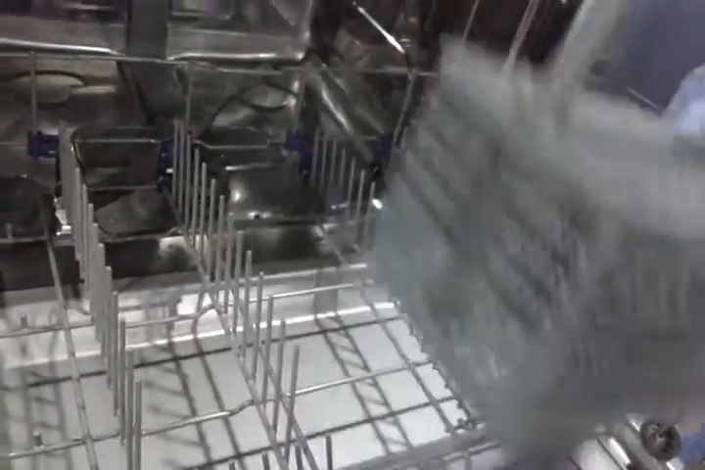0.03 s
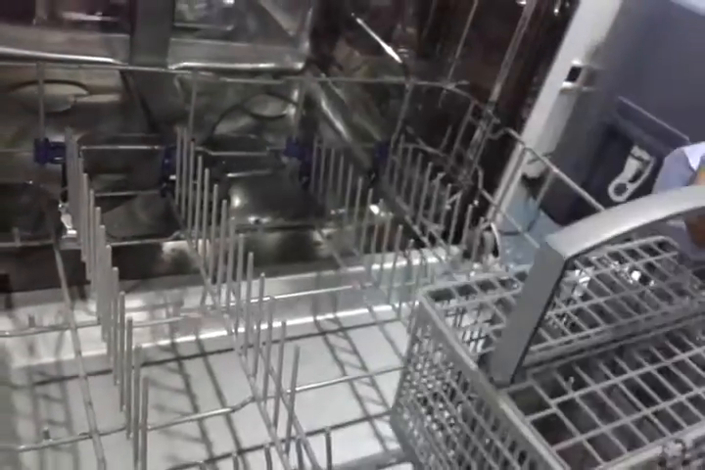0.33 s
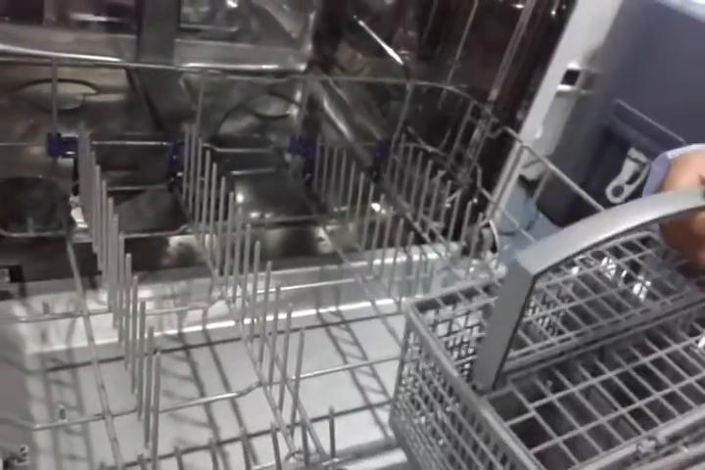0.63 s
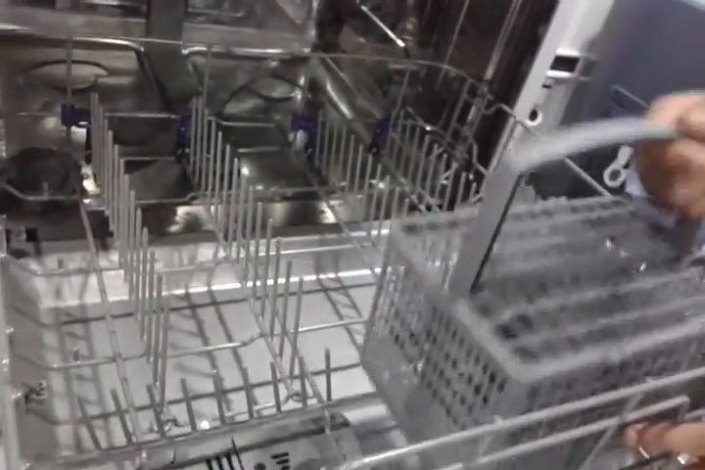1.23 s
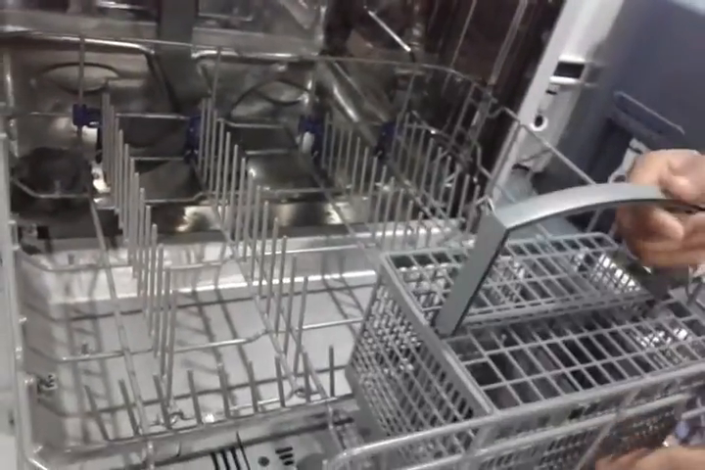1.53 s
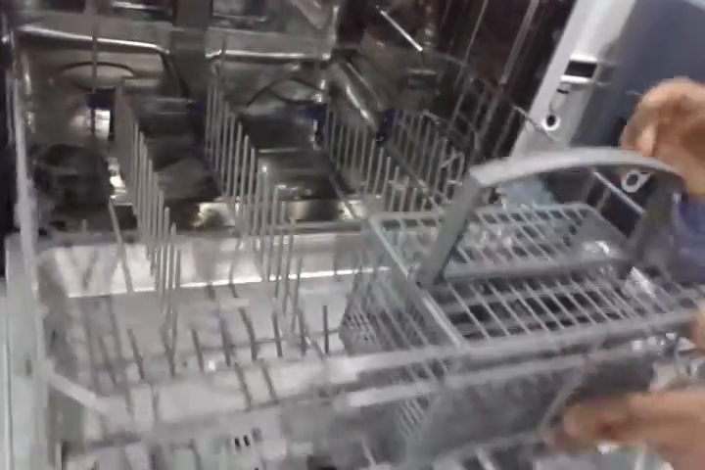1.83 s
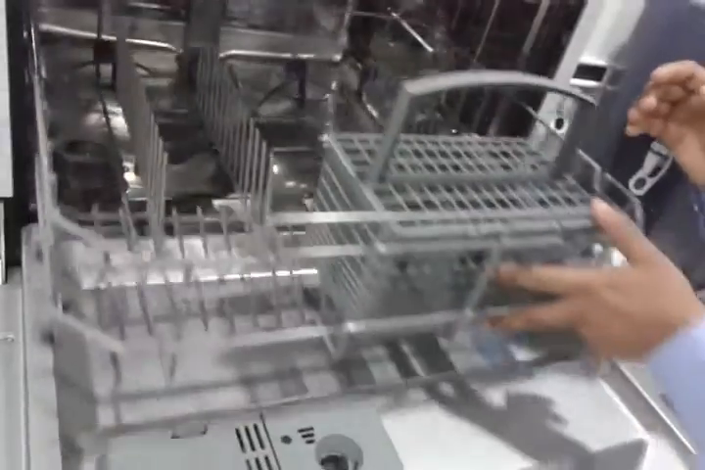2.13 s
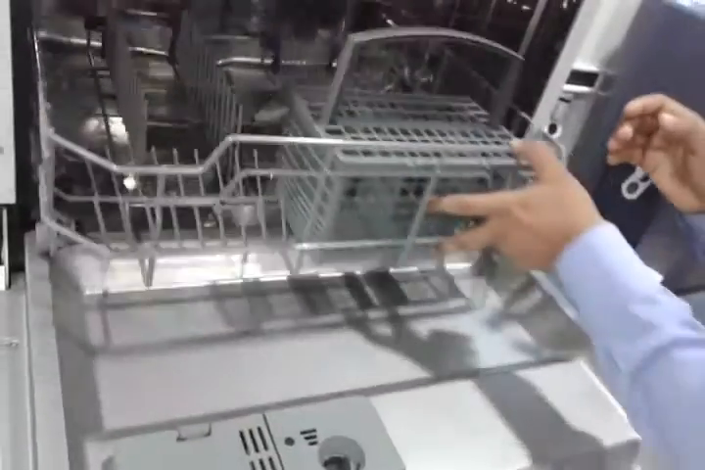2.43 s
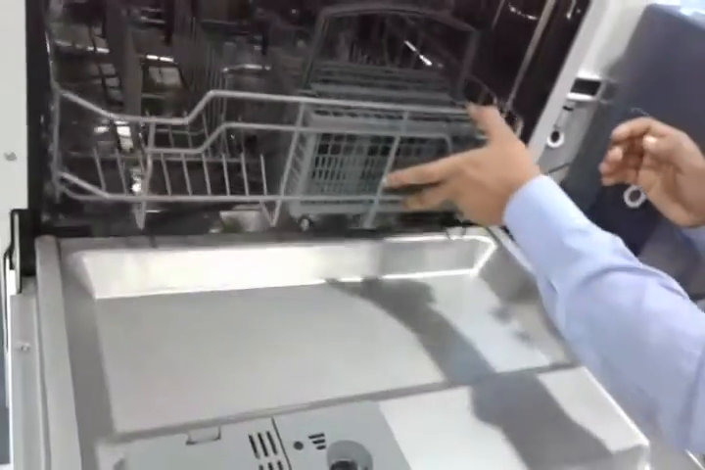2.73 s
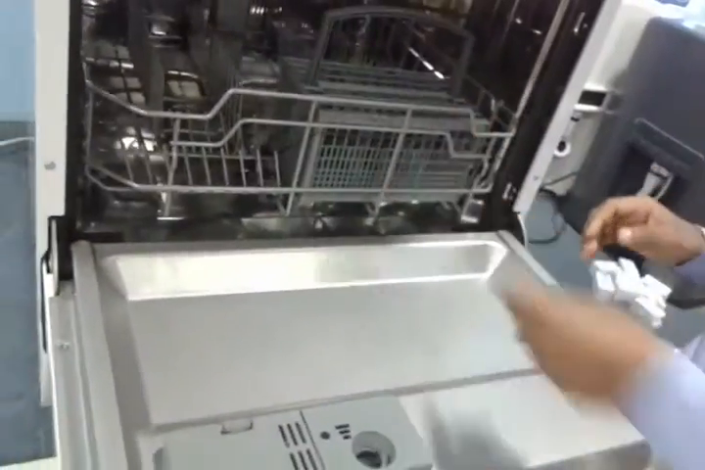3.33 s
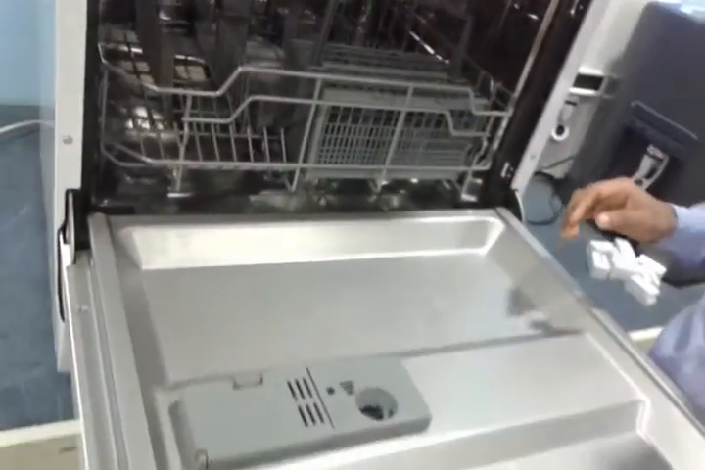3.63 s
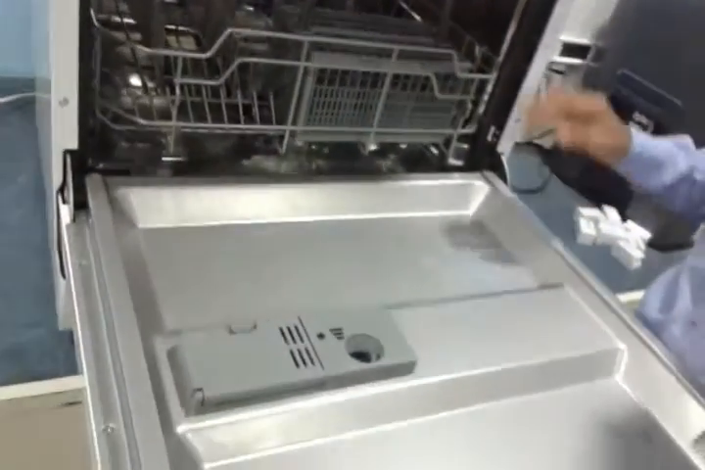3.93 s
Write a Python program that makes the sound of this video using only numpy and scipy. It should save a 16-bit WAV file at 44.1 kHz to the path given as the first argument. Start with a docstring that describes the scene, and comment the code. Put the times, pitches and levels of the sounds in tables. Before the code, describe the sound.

A dishwasher's wire rack clatters as a plastic cutlery basket lands in it at 0.3 seconds, with more clacks from 1 to 1.5 seconds. From about 1.8 seconds the rack rolls in, wheels rumbling and ticking, guides scraping. At 3 seconds it bangs against the stop; wires jangle and the steel tub booms, fading. A faint scrape comes near 4 seconds. Ventilation runs steadily in the small room.

```python
"""Over steady ventilation noise in a small hard room, a plastic cutlery basket clatters into a
dishwasher's wire rack, then is lifted and seated with a few clacks. The rack rolls in over the open
door, wheels rumbling and ticking, guides scraping. It bangs against the back stop: its wires
jangle and the steel tub booms."""
import sys
import numpy as np
from scipy import signal
from scipy.fft import rfft, irfft
from scipy.io import wavfile

SR = 44100
rng = np.random.default_rng(int(sys.argv[2]) if len(sys.argv) > 2 else 0)


def unload_audio(sound):
    """Save the sound as a 16-bit wav file, at the path given as the first command line argument."""
    columns = np.transpose(np.atleast_2d(sound))
    # keep every value between -1 and 1, then stretch to whole-number steps
    steps = np.round(np.clip(columns, -1, 1) * 32767)
    wavfile.write(sys.argv[1], SR, steps.astype(np.int16))


N = 176400
T = np.arange(N) / SR
RING_T = T[:SR]

# low resonances of the rack: pitch_hz, level_db, t60_s
RACK_MODES = [(113.4, -22.5, 0.42), (171, -31, .2), (222.6, -7, 0.22), (261.7, -1, 0.13),
              (291.2, -4.5, 0.25), (321.4, -5, 0.12), (353.2, -12.5, 0.2), (389.6, -13, 0.21),
              (426.6, -13.5, 0.2), (493.5, -20, .2)]
# spectrum of the rack's wires: freq_hz, level_db
WIRE_SPECTRUM = [(300, 11), (450, -3.5), (740, 1.5), (950, -7), (1400, -1), (1850, 1), (2400, -3.5),
                 (3100, -7), (3800, -3), (4400, 0), (5400, -2.5), (6200, -14.5), (8000, -24.5),
                 (13000, -44)]


def amp(db):
    """Decibels to gain."""
    return 10 ** (np.asarray(db) / 20)


def add(track, start_s, sound):
    """Mix a sound in at start_s."""
    i = int(start_s * SR)
    track[i:i + len(sound)] += sound[:N - i]


def butter(x, kind, cutoff_hz, order=2):
    """Butterworth filter."""
    return signal.sosfilt(signal.butter(order, cutoff_hz, kind, fs=SR, output="sos"), x)


def colour(x, spectrum):
    """Impose a spectrum, falling 12 dB per octave below its first point; rms 1."""
    freq_hz, level_db = np.array(spectrum).T
    bin_hz = np.arange(len(x) // 2 + 1) * SR / len(x)
    gain = amp(np.interp(np.log(bin_hz + 1), np.log(freq_hz), level_db))
    gain *= np.minimum(bin_hz / freq_hz[0], 1) ** 2
    shaped = irfft(rfft(x) * gain, len(x))
    return shaped / np.sqrt(np.mean(shaped ** 2))


def fade(t60_s):
    """One second of exponential decay."""
    return np.exp(-np.log(1000) * RING_T / t60_s)


def burst(spectrum, t60_s):
    """Dense modes dying together, as decaying noise."""
    return colour(rng.standard_normal(SR), spectrum) * fade(t60_s)


def ring(modes, detune=0):
    """Damped sines starting at rms 1; changing contact shifts each pitch a little."""
    rms = np.sqrt(sum(amp(level_db) ** 2 for _, level_db, _ in modes) / 2)
    shifts = 1 + detune * rng.standard_normal(len(modes))
    return sum(amp(level_db) * np.sin(2 * np.pi * pitch_hz * shift * RING_T) * fade(t60_s)
               for (pitch_hz, level_db, t60_s), shift in zip(modes, shifts)) / rms


def body_ring(modes, detune=0, build_s=0.006):
    """Low modes of a large body, which take a moment to build."""
    return butter(ring(modes, detune) * (1 - np.exp(-RING_T / build_s)), "band", (81.4, 2000))


def chatter(length_s, contacts_per_s=900):
    """A first contact and a quick run of dwindling ones; unit energy."""
    t = T[:SR // 20]
    taper = np.sqrt(np.maximum(1 - t / length_s, 0))
    sizes = rng.choice([-1, 1], len(t)) * rng.uniform(0.26, 1, len(t)) * taper
    hits = (rng.random(len(t)) < contacts_per_s / SR) * sizes
    hits[0] = 1
    return hits / np.sqrt(np.sum(hits ** 2))


def grains(contacts_per_s):
    """Random tiny contacts of uneven size."""
    hits = (rng.random(N) < contacts_per_s / SR) * rng.choice([-1, 1], N)
    level_db = np.minimum(rng.exponential(size=N), 4)
    return hits * amp(level_db)


def room(x, wet_db, split_hz=6000, build_s=0.0055):
    """Add the reverberation of tub and room, shorter in the treble."""
    noise = rng.standard_normal(SR)
    low = butter(noise, "low", split_hz, order=4) * fade(t60_s=0.71)
    high = butter(noise, "high", split_hz, order=4) * fade(t60_s=0.44)
    tail = (low + high) * (1 - np.exp(-RING_T / build_s))
    tail /= np.sqrt(np.sum(tail ** 2))
    return x + amp(wet_db) * signal.fftconvolve(x, tail)[:N]


def ventilation(air_db=-39, hiss_db=-71.5):
    """Steady air noise and a faint white hiss."""
    # air noise: freq_hz, level_db
    air_spectrum = [(15, -62), (25, -39), (44, -27), (74, -24), (87, -14.5), (119, -20.5), (140, -7),
                    (197, -12.5), (219, -3.5), (237, -0.5), (293, -7.5), (363, -5.5), (392, -8.5),
                    (425, -9), (498, -12.5), (539, -14.5), (824, -12), (940, -14), (1070, -17),
                    (1360, -17.5), (2030, -19.5), (2940, -28), (4600, -20), (7420, -40), (14000, -50)]
    air = amp(air_db) * colour(rng.standard_normal(N), air_spectrum)
    return air + amp(hiss_db) * rng.standard_normal(N)


def basket_knocks(jangle_re_click_db=-22.5, click_band_hz=(3800, 6060)):
    """Each knock clicks the plastic lattice, clacks its walls, shakes the rack and stirs its wires."""
    # basket on rack: start_s, chatter_s, click_db, crack_db, clack_db, thud_db
    knocks = [(0.271, .006, -36, -33.5, -35, -38), (0.285, .002, -34, -34, -34, -16),
              (0.292, .003, -45, -54, -23.5, -22), (0.3158, 0.0027, -21.5, -30, -25.5, -18.5),
              (0.322, .005, -19.5, -47, -21.5, -29), (0.3324, .001, -10, -24.5, -25, -24),
              (0.36, 0.017, -30, -33, -30, -25), (0.377, .010, -44, -48, -46, -20),
              (0.417, .002, -48, -50, -45, -21), (.5350, .004, -56, -64, -46, -25.5),
              (1.0353, 0.018, -21, -27, -23.5, -24), (1.094, .007, -28, -37.5, -33, -24),
              (1.105, .006, -44, -55, -36, -20.5), (1.189, .010, -38, -58, -48, -23),
              (1.2493, .001, -22, -41, -55, -46), (1.2593, .002, -50, -55, -31.5, -24),
              (1.302, .006, -51, -57, -47, -28), (1.3601, .002, -16.5, -26, -28.5, -28.5),
              (1.363, .005, -23, -46, -38, -25.5), (1.386, .012, -48, -56, -34.5, -28),
              (1.4220, .006, -22.5, -54, -37, -30), (1.4280, .012, -27, -40, -26, -17),
              (1.456, .006, -52, -57, -39, -32), (1.4740, .002, -42, -50, -49, -36),
              (1.5110, .016, -30.5, -35.5, -32, -19), (1.523, .006, -42, -49, -37, -30),
              (2.571, 0.013, -26.5, -36, -36, -53), (2.661, 0.0098, -27, -35, -34, -32)]
    # lattice resonances: pitch_hz, level_db, t60_s
    plastic_modes = [(4270, -13, 0.0043), (4760, 4, 0.008), (5140, 7.5, .007), (5450, -17, 0.0042)]
    # bright crack and midrange clack: freq_hz, level_db
    crack_spectrum = [(1500, -12), (3500, -3), (5300, 14), (7000, 0.5), (9000, -5), (11500, -11),
                      (13500, -13)]
    clack_spectrum = [(250, 11), (450, 2.5), (750, -3), (1200, -1.5), (2000, 1.5), (2450, -3), (3000, -12),
                      (4500, -8), (6000, -26), (9000, -46)]
    clicks, cracks, clacks, thuds, wires = np.zeros((5, N))
    for start_s, chatter_s, click_db, crack_db, clack_db, thud_db in knocks:
        hits = chatter(chatter_s)
        click = butter(ring(plastic_modes, detune=0.032), "band", click_band_hz)
        crack = burst(crack_spectrum, t60_s=0.028)
        clack = burst(clack_spectrum, t60_s=0.062)
        add(clicks, start_s, amp(click_db) * signal.fftconvolve(hits, click))
        add(cracks, start_s, amp(crack_db) * signal.fftconvolve(hits, crack))
        add(clacks, start_s, amp(clack_db) * signal.fftconvolve(hits, clack))
        add(thuds, start_s, amp(thud_db) * body_ring(RACK_MODES, detune=0.021))
        add(wires, start_s, amp(click_db + jangle_re_click_db) * burst(WIRE_SPECTRUM, t60_s=0.43))
    plastic = room(clicks, wet_db=-16) + room(cracks, wet_db=-7.5) + room(clacks, wet_db=-1.5)
    return plastic + wires + room(thuds, wet_db=-12.5)


def rack_rolling():
    """Wheels rumble over the door; the rack scrapes and bumps along its guides."""
    # rolling envelope: time_s, level_db
    roll_levels = [(1.72, -68), (1.879, -41.5), (2.02, -37), (2.2, -38), (2.38, -39), (2.55, -44),
                   (2.72, -40.5), (2.83, -45.5), (2.94, -39.5), (3.0, -68)]
    # scrapes and wheel bumps: peak_s, rise_s, fall_s, hiss_db, rattle_db, rumble_db
    scrapes = [(1.904, 0.014, 0.046, -57, -41, -39), (2.022, 0.015, 0.022, -36, -36.5, -46),
               (2.118, 0.0081, 0.028, -41.5, -40, -52), (2.355, 0.013, 0.045, -49.5, -38, -30),
               (2.485, .010, .014, -43.5, -38, -40), (2.516, 0.0073, 0.024, -49, -41, -39),
               (2.574, .010, .015, -35.5, -41, -41), (2.666, 0.013, 0.012, -33, -36.5, -33.5),
               (2.695, 0.018, 0.12, -58, -41, -57), (2.890, 0.0086, 0.02, -37.5, -35.5, -46),
               (3.96, 0.05, 0.076, -46.5, -65, -63)]
    # wheel noise and the three scrape layers: freq_hz, level_db
    wheel_spectrum = [(40, -37), (110, 3.5), (170, -3), (260, 1), (420, 0.5), (700, -1), (1100, -9),
                      (1600, -10), (2800, -19.5), (4500, -14), (6500, -26), (13000, -44)]
    hiss_spectrum = [(1000, -36), (2700, -1.5), (4000, 1), (5300, 1), (6600, -9.5), (9000, -16.5),
                     (13500, -27)]
    rattle_spectrum = [(300, -14), (700, 3), (1100, 3.5), (1550, 8.5), (2200, -3.5), (3000, -16),
                       (6000, -32)]
    rumble_spectrum = [(50, -17), (110, -12), (170, -4.5), (260, 3), (400, -3.5), (600, -8), (1200, -45)]
    time_s, level_db = np.array(roll_levels).T
    wheels = colour(grains(contacts_per_s=1500), wheel_spectrum)
    wheels *= amp(np.interp(T, time_s, level_db, left=-120, right=-120))
    envelopes = np.zeros((3, N))
    for peak_s, rise_s, fall_s, *layers_db in scrapes:
        shape = np.exp(-(np.minimum(T - peak_s, 0) / rise_s) ** 2 - np.maximum(T - peak_s, 0) / fall_s)
        envelopes += amp(layers_db)[:, None] * shape
    spectra = hiss_spectrum, rattle_spectrum, rumble_spectrum
    rubs = sum(envelope * colour(grains(contacts_per_s=1400), spectrum)
               for envelope, spectrum in zip(envelopes, spectra))
    return room(wheels + rubs, wet_db=-8)


def wheel_ticks(rail_s=2.662, rail_db=-36):
    """The wheels tick at joints in the guides and ring the frame as they drop onto the tub's rail."""
    # joint crossings: start_s, level_db
    joints = [(2.484, -54), (2.750, -45)]
    # one tick: freq_hz, level_db
    tick_spectrum = [(6000, -11), (9000, 0), (13500, -3)]
    # wire frame resonances: pitch_hz, level_db, t60_s
    frame_modes = [(722, 0, 0.42), (1563, -6, 0.22)]
    ticks = np.zeros(N)
    for start_s, level_db in joints:
        add(ticks, start_s, amp(level_db) * burst(tick_spectrum, t60_s=0.03))
    track = room(ticks, wet_db=-10)
    add(track, rail_s, amp(rail_db) * body_ring(frame_modes))
    return track


def back_stop_bang(jangle_re_wire_db=-10.5, tines_re_wire_db=-17):
    """The rack hits its stop and rebounds: a hard clash, jangling wires, clear tines, a tub boom."""
    # rack on stop: start_s, chatter_s, wire_db, clash_db, thud_db, boom_db
    blows = [(2.9591, 0.0099, -19.5, -15, -20, -22), (2.9680, 0.0056, -13, -18, -26, -25.5),
             (2.9756, 0.0055, -21, -18, -32, -22), (3.005, .004, -24, -29, -28, -40)]
    # steel tub and tine resonances: pitch_hz, level_db, t60_s
    tub_modes = [(115.7, -1, 0.58), (118, 1, .56), (151, 2.5, 0.6), (184, -17, 0.99), (264, 6.5, 0.22),
                 (312.5, -1, 0.54), (466, -13, 0.64), (620, -13, .6)]
    tine_modes = [(1420, -8, .7), (1500, 1, .8), (1875, 4, .7), (1854, 7, 0.51), (3580, -7, .7),
                  (3875, 0, .75), (3940, 5, 0.63), (4171, 4, 0.68), (4220, 4, 0.51), (4350, 3, 0.57),
                  (5063, -1, 0.99), (5190, -10, 0.88)]
    # hard contact: freq_hz, level_db
    clash_spectrum = [(1500, -19), (3500, 8), (5500, 8), (7000, -5.5), (9000, -12.5), (11000, -17),
                      (13500, -25)]
    metal, clashes, booms = np.zeros((3, N))
    thud, boom = body_ring(RACK_MODES), body_ring(tub_modes)
    for start_s, chatter_s, wire_db, clash_db, thud_db, boom_db in blows:
        contact = amp(wire_db) * burst(WIRE_SPECTRUM, t60_s=0.054)
        contact += amp(clash_db) * burst(clash_spectrum, t60_s=0.043)
        add(clashes, start_s, signal.fftconvolve(chatter(chatter_s), contact))
        jangle = amp(jangle_re_wire_db) * burst(WIRE_SPECTRUM, t60_s=0.98)
        tines = amp(tines_re_wire_db) * ring(tine_modes, detune=0.00104)
        add(metal, start_s, amp(wire_db) * (jangle + tines))
        add(booms, start_s, amp(thud_db) * thud + amp(boom_db) * boom)
    return metal + room(clashes, wet_db=-8.5) + room(booms, wet_db=-15.5)


def scene():
    """Basket, rolling rack and bang over the room's air; the machine's sounds carry nothing below about 70 Hz."""
    machine = basket_knocks() + rack_rolling() + wheel_ticks() + back_stop_bang()
    return (ventilation() + butter(machine, "high", cutoff_hz=70))[None]


def record(dry, top_hz=14200):
    """Steep low-pass."""
    return signal.sosfilt(signal.ellip(10, .2, 80, top_hz, fs=SR, output="sos"), dry)


dry = scene()
out = record(dry)
unload_audio(out)
```